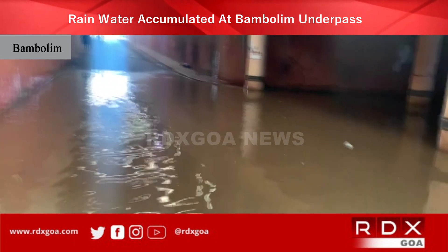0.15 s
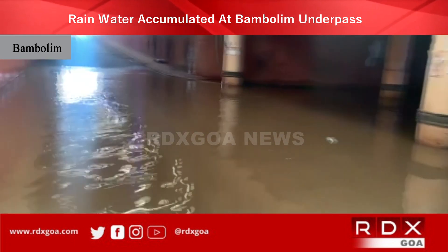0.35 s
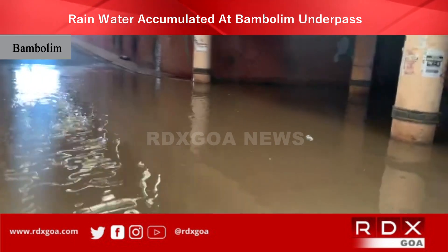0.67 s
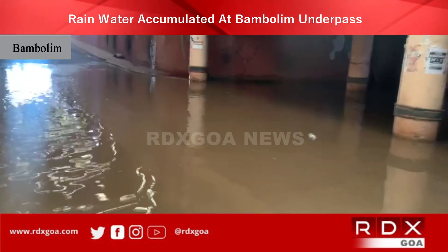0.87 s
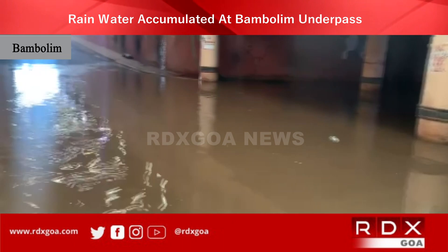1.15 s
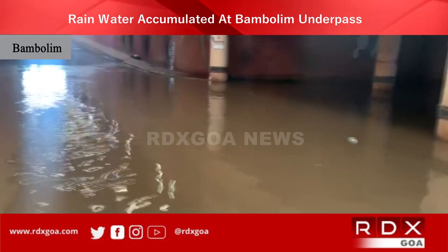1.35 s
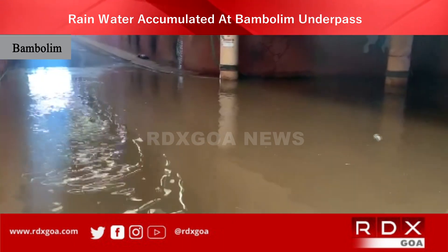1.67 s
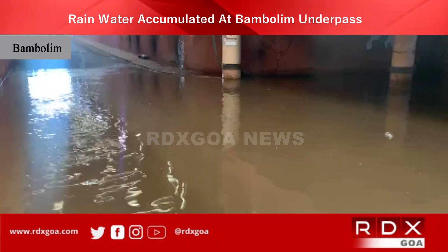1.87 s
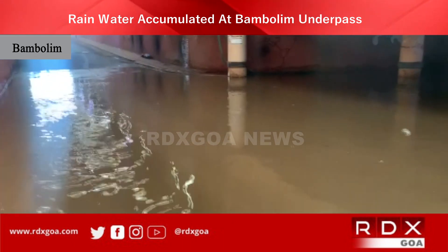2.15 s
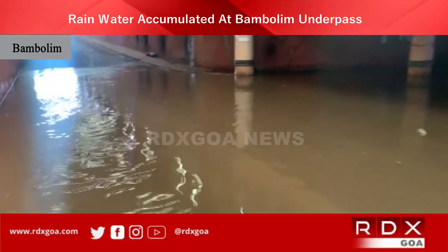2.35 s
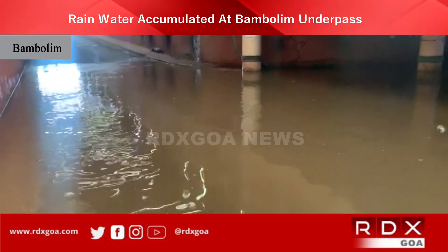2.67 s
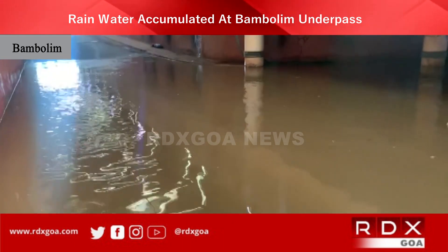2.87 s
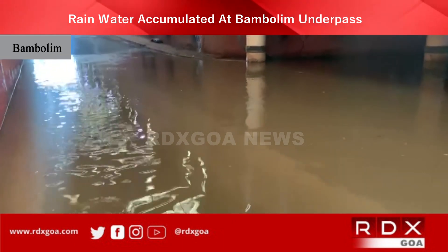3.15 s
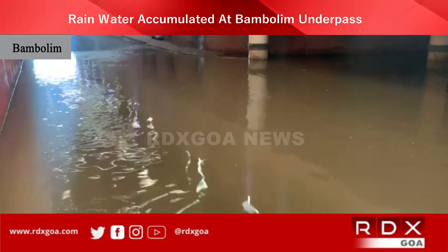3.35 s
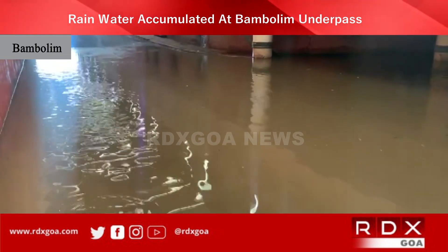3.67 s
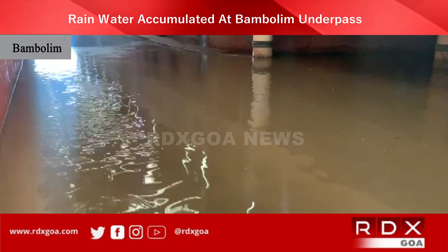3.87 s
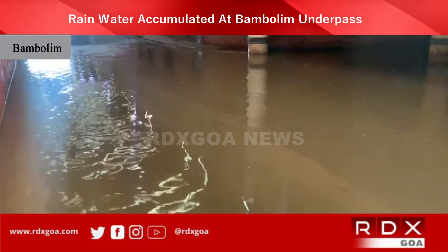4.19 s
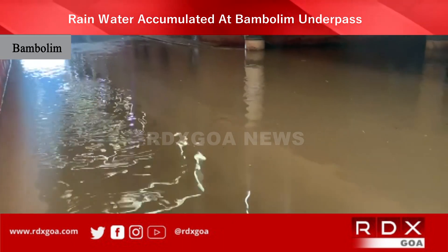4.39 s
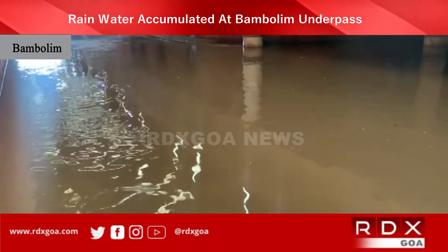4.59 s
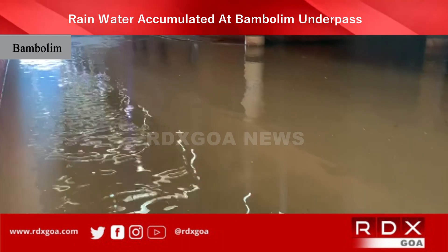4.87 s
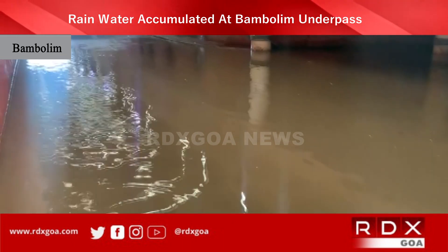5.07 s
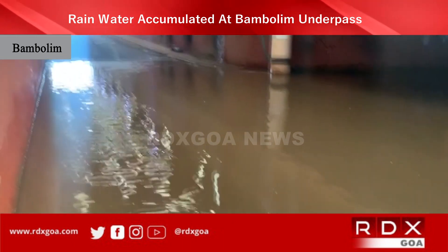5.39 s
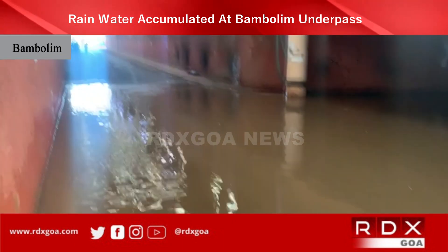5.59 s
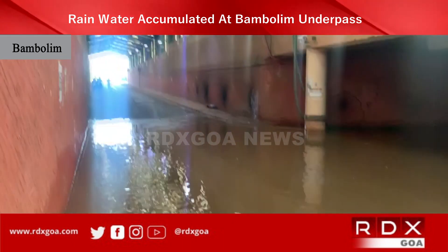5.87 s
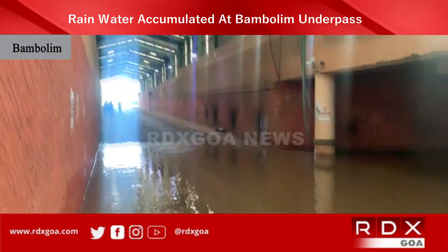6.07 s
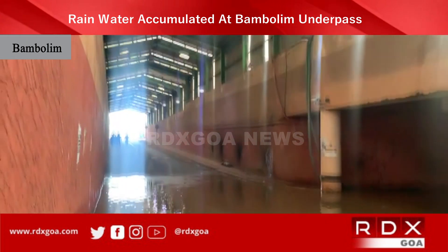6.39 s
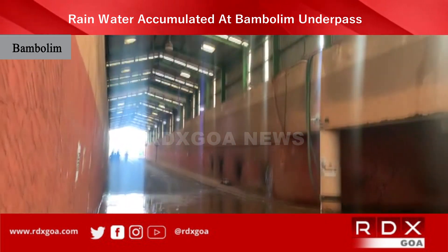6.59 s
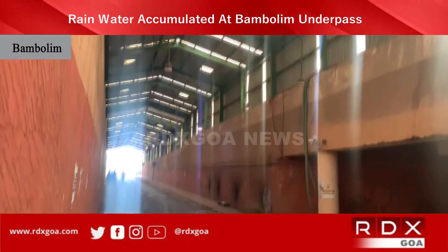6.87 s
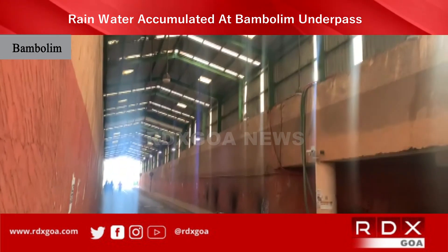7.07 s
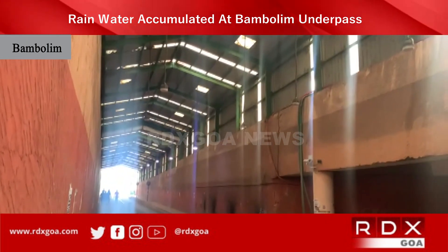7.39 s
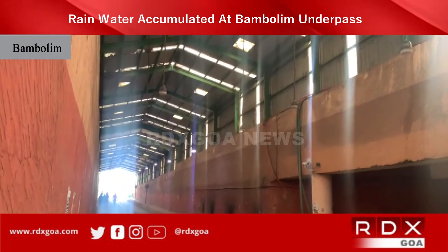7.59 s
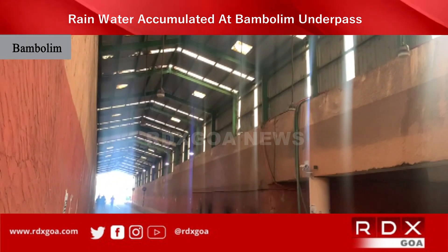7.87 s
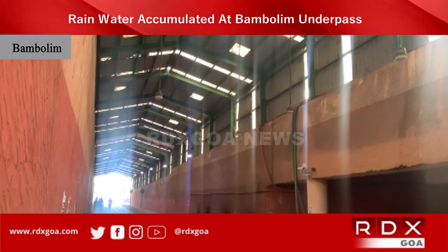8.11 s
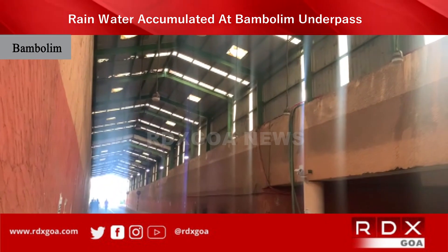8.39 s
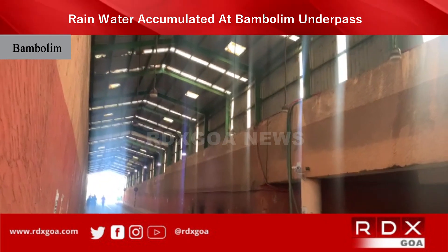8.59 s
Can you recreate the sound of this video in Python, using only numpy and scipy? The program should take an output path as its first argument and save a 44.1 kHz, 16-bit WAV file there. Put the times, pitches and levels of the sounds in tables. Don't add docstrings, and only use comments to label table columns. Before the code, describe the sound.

Deep throbbing engine boom fills an echoing underpass as wet tyre roar and bright spray swell and fade, with faint blurred clangs and horns.

```python
import sys
import numpy as np
from scipy import signal
from scipy.io import wavfile
from scipy.ndimage import uniform_filter1d, minimum_filter1d

SR = 44100
rng = np.random.default_rng(int(sys.argv[2]) if len(sys.argv) > 2 else 0)


def elevation(decibels):
    levels = np.asarray(decibels, float)
    return 10 ** (levels / 20)


def log_audio(samples):
    frames = np.atleast_2d(samples).T
    limited = np.clip(frames, -1, 1)
    pcm = np.round(limited * 32767).astype(np.int16)
    wavfile.write(sys.argv[1], SR, pcm)


N = 385434


def evened(x):
    return x / np.sqrt(np.mean(x ** 2) + 1e-20)


def read(points, hz):
    f, value = np.transpose(points)
    return np.interp(np.log(hz + 1), np.log(f + 1), value)


def track(rows, t):
    s, value = np.transpose(rows)
    return np.interp(t, s, value)


def wander(t, lo_hz, hi_hz):
    rates_hz = np.geomspace(lo_hz, hi_hz, num=24)
    return evened(sum(np.sin(2 * np.pi * (f * t + rng.random())) / np.sqrt(f) for f in rates_hz))


def resonate(x, hz, width_hz):
    turn = np.exp(2j * np.pi * np.cumsum(hz * np.ones(x.shape[-1])) / SR)
    r = np.exp(-np.pi * width_hz / SR)
    return 2 * (turn * signal.lfilter([(1 - r) ** 2], [1, -2 * r, r * r], x / turn)).real


# time in seconds, share of the way out (0-1).
WALK = [(0, 0), (1, .3), (2.6, .85), (3.6, 1), (6, 1), (8.74, .85)]


def dead_spot(t):
    return 1 - track(WALK, t)


def boom_level_db(t):
    return -27 + 3.5 * dead_spot(t)


# frequency in Hz, width in Hz, level in dB.
TUNNEL_MODES = [(59.5, 12, 0), (73.5, 8, 0), (119, 30, 0)]


def tunnel_gain(hz):
    gain = elevation(-13.5)
    for mode_hz, width_hz, db in TUNNEL_MODES:
        gain = gain + elevation(db) / (1 + (2 * (hz - mode_hz) / width_hz) ** 2) ** 2
    return gain


# time in seconds, engine cycles per second.
SPEED = [(0, 9.78), (.4, 9.95), (.85, 9.81), (1.45, 9.94), (1.85, 9.9), (2.42, 9.48), (3.15, 10.2),
         (3.6, 10.11), (3.9, 9.95), (4.7, 10.14), (5.05, 10), (5.75, 9.54), (6.45, 10.62), (6.9, 9.42),
         (7.33, 10.42), (7.9, 9.5), (8.35, 9.47), (8.74, 9.6)]
# time in seconds, effort in dB.
EFFORT = [(0, -21.5), (.3, -13), (.8, -24), (1.2, -18), (2.0, -29), (2.25, -19), (3.1, -20), (3.6, -23),
          (4.2, -16.5), (4.6, -19), (5.5, -15.5), (6.6, -17.5), (7.55, -18.5), (7.85, -17.5), (8.74, -17)]
# level in dB on top of a mode, share of effort (0-1), dB added in the dead spot.
LOW_ORDERS = [(-19.5, 0.2, -0.5), (-18, 0.06, -11), (-19, 0.12, -0.5), (-18.5, 0.71, -2.5),
              (-19.5, 0.72, -1), (-23, 1, 0.5), (-22, .9, -0.6), (-21.5, 1, -0.3), (-21.5, .9, 1.8)]
HIGH_ORDERS_DB = [-17, -8, -10, -13.5, -16.5, -17.5, -19, -20, -14.5, -14.5, -17, -15.5, -16, -16, -14.5]


def engine(drift_db, jitter):
    t = np.arange(0, N, 32) / SR
    cycle_hz = uniform_filter1d(track(SPEED, t), size=200)
    effort_db = track(EFFORT, t) + 18
    dead = dead_spot(t)
    sizes = []
    for order, (db, share, dead_db) in enumerate(LOW_ORDERS, 5):
        sizes.append(elevation(db + share * effort_db + dead_db * dead) * tunnel_gain(order * cycle_hz))
    sizes += [elevation(boom_level_db(t) + db) for db in HIGH_ORDERS_DB]
    turns = np.cumsum(cycle_hz) * 32 / SR
    out = np.zeros((2, len(t)))
    for order, size in enumerate(sizes, 5):
        lag_turns = .09 + .7 * (order < 9)
        offset = (.09 + .2 * (order > 13)) * rng.standard_normal()
        phase = 2 * np.pi * (order * (turns - lag_turns) + (order == 5) / 2 + offset)
        phase = phase + jitter * order / 8 * wander(t, 1.5, 7.4)
        size = size * elevation(drift_db * wander(t, 0.61, 2.8))
        apart = order * (0.0034 + 0.023 * wander(t, .3, 2.5))
        out += np.sqrt(2) * size * np.cos([phase + apart, phase - apart])
    out[:, 450:] += .2 * out[:, :-450].copy()
    return .95 * signal.resample_poly(out, up=32, down=1, axis=1)[:, :N]


# frequency in Hz, correlation.
LIKENESS = [(60, 1), (130, 0.77), (200, 0.81), (290, 0.15), (440, 0.35), (700, 0.1), (9000, 0.0042)]


def wash(shape, level_db, patchy_db, flicker_db, size):
    hop = size // 4
    frames, hz = N // hop + 5, np.fft.rfftfreq(size, 1 / SR)
    a, b, c, d, patches = rng.standard_normal((frames, len(hz), 5)).T
    patches = uniform_filter1d(patches, size=size // 100, axis=0)
    patches = evened(uniform_filter1d(patches, size=5000 // hop, axis=1))
    same = np.clip(read(LIKENESS, hz), -1, 1)[:, None]
    left = a + 1j * b
    right = same * left + np.sqrt(1 - same ** 2) * (c + 1j * d)
    flicker = wander(np.arange(frames) * hop / SR, 3.0, 25)
    gain = elevation(read(shape, hz)[:, None] + patchy_db * patches + flicker_db * flicker)
    noise = signal.istft(np.array([left, right]) * gain, nperseg=size, noverlap=size - hop)[1][:, :N]
    return elevation(level_db) * evened(noise)


# frequency in Hz, level in dB per Hz.
BOOM = [(22, 3), (40, 1), (58, 5.5), (74, 4.5), (92, 4.5), (120, 11), (145, 5), (180, 0.5), (205, -3),
        (240, 0.5), (275, 0), (305, -3), (400, -40.5)]


def boom(t):
    return wash(BOOM, boom_level_db(t) + 1.2, patchy_db=1.5, flicker_db=1.5, size=4096)


# arrival in seconds, leaving in seconds, roar gain in dB, spray gain in dB.
PASSES = [
    (-.5, 0.094, -2, -3.1),
    (1.442, 4.2, 1.33, 1.9),
    (5.15, 6.806, 3.5, 2),
    (6.997, 8.006, 3, -0.7),
    (8.093, 9, 3, -1.7),
]


def passes(t, rise_s, which):
    gains = []
    for row in PASSES:
        rise = (t - row[0]) / rise_s
        leave = 1 + (row[1] - t) / .4
        gains.append(row[which] * np.clip(np.minimum(rise, leave), 0, 1))
    return np.max(gains, axis=0)


# frequency in Hz, level in dB per Hz.
ROAR = [(500, -15), (800, -1.5), (900, -3.5), (1000, -1), (1300, -3.5), (1800, -6.5), (2200, -9),
        (2800, -11.5), (3500, -22), (5000, -47)]


def roar(t):
    level_db = -37 + passes(t, rise_s=0.12, which=2)
    return wash(ROAR, level_db, patchy_db=1.0, flicker_db=-0.28, size=1024)


# frequency in Hz, level in dB per Hz.
SPRAY = [(1200, -8.5), (1800, 2), (2500, 6), (3500, 8.5), (4400, 7.5), (5200, 0.5), (6300, 2.5),
         (7000, -7.5), (7800, -19.5)]


def spray(spray_db):
    return wash(SPRAY, spray_db, patchy_db=1.0, flicker_db=0.64, size=512)


# time in seconds, peak in dB.
BURSTS = [(1.2695, -40), (3.4226, -37), (5.0898, -33), (5.4854, -40), (5.9559, -41), (6.3754, -41),
          (7.5398, -40), (7.7573, -41)]


def droplets(level_db, per_s, spread_db):
    size = elevation(spread_db * np.minimum(rng.exponential(1, (2, N)), 3))
    size = size * (rng.random((2, N)) < per_s / SR)
    ticks = elevation(level_db) * evened(size * rng.choice([-1, 1], (2, N)))
    out = np.pad(ticks, ((0, 0), (0, 2600)))
    t = np.arange(2600) / SR
    for s, db in BURSTS:
        start = round(s * SR)
        out[:, start:start + len(t)] += rng.standard_normal((2, len(t))) * elevation(db - 1 - 60 * t / .07)
    return signal.sosfilt(signal.butter(2, 5500, "high", fs=SR, output="sos"), out)[:, :N]


# start in seconds, length in seconds, level in dB, centre in Hz, fade in dB per second.
SQUEAL = [
    (0, 0.85, -42.5, 3520, 8.5),
    (1.048, 0.84, -47, 3484, -2),
    (1.901, 1.2, -43, 3416, 7.5),
]


def squeal():
    out = np.zeros((2, N))
    for s, length_s, db, hz, fade in SQUEAL:
        at = np.arange(round(s * SR), round((s + length_s) * SR))
        t = at / SR - s
        band = resonate(rng.standard_normal((2, len(at))), hz - 46 * t, width_hz=330)
        out[:, at] += elevation(db - fade * t) * evened(band) * signal.windows.tukey(len(at), .08)
    return out


# frequency in Hz, level in dB per Hz.
RUMBLE = [(250, -17), (310, -4), (345, 5.5), (420, 3.5), (470, -2.5), (530, -6.5), (650, -8.5),
          (800, -10.5), (1100, -34)]


def rumble(t):
    return wash(RUMBLE, -29.5 - .5 * t, patchy_db=1.23, flicker_db=0.84, size=2048)


# start in seconds, length in seconds, pitch in Hz, level in dB, fade in dB per second.
CLANGS = [(0, .35, 630, -35, 14), (0, .3, 735, -37, 16), (0, .34, 800, -45, 5), (.85, .2, 860, -43, 13),
          (1.52, .2, 1170, -42, 17), (2.1, .9, 1234, -48, 1), (3.1, .45, 1190, -46, -2),
          (5.12, .4, 970, -45, 7.5), (5.12, .2, 1500, -39, 22), (6.4, .75, 987, -46, -2),
          (6.3, .8, 1700, -47, 5), (7.5, .5, 2910, -50, 4), (8.18, .5, 835, -40.5, 6),
          (8.5, .24, 940, -47, 4)]
HORNS = [
    (1.5, .15, 900, -41, 25),
    (1.73, 1.1, 1805, -44.5, 3),
    (7.9, .7, 600, -42, 1),
    (7.1, .3, 560, -43, 3),
]
WHOOSHES = [
    (0, .3, 680, -35.5, 22),
    (1.5, .3, 1300, -43, 11),
    (5.1, .2, 1400, -43, 15.5),
]


def rings(rows, width_hz):
    out = np.zeros((2, N))
    for s, length_s, hz, db, fade in rows:
        at = np.arange(round(s * SR), min(round((s + length_s + .4) * SR), N))
        t = at / SR - s
        onset = np.minimum(t / 0.0083 + (s == 0), 1)
        shape = elevation(db - fade * t - 33 * np.maximum(t - length_s, 0)) * onset
        tone = resonate(rng.standard_normal((2, len(at) + 4000)), hz, width_hz)[:, 4000:]
        out[:, at] += shape * evened(tone)
    return out


def scene():
    t = np.arange(N) / SR
    spray_db = -44.5 + passes(t, rise_s=0.47, which=3)
    out = engine(drift_db=1.87, jitter=.12) + boom(t)
    out += roar(t) + spray(spray_db)
    out += droplets(spray_db - 10.5, per_s=300, spread_db=3.5)
    out += squeal() + rumble(t)
    out += rings(CLANGS, width_hz=30) + rings(HORNS, width_hz=110) + rings(WHOOSHES, width_hz=450)
    return out


# frequency in Hz, gain in dB.
LEFT_COLOUR = [(60, -1.1), (200, -.7), (440, -.7), (1000, 0), (7930, 0), (8030, 0), (8500, -3), (9000, -6),
               (10000, -8), (11000, -11), (11600, -19), (11850, -28), (13400, -36), (13700, -55)]
RIGHT_COLOUR = [(60, 1.1), (200, .7), (440, .7), (1000, 0), (7930, 0), (8030, 9.5), (9400, 4.5),
                (10000, -3), (11000, -14), (11850, -29), (12050, -20), (13300, -18), (13900, -22),
                (14300, -23)]


def colour_sides(x):
    hz, _, z = signal.stft(x, SR, nperseg=2048)
    colour = elevation(np.array([read(LEFT_COLOUR, hz), read(RIGHT_COLOUR, hz)]))
    return signal.istft(z * colour[..., None], SR, nperseg=2048)[1][:, :N]


def soft_limit(x):
    peak = -minimum_filter1d(-abs(x).max(axis=0), size=900)
    return x / np.maximum(uniform_filter1d(peak, size=900) / .83, 1)


# frequency in Hz, step in dB over the band level.
SUM_STEP = [(300, -20), (1000, 1), (2100, 7), (2600, 6), (3100, 9), (3600, 7), (4500, 7), (4900, 11.5),
            (5500, 11.5), (5750, 4), (6750, 4), (7000, 14.5), (7550, 16), (7700, 7)]
DIFFERENCE_STEP = [(300, -15), (1000, -1), (2200, 3), (2700, 6), (3300, 5), (3900, 8), (4500, 7), (4900, 3),
                   (5550, 3), (5800, 12), (6400, 16), (6800, 13), (7000, 3)]


def phone_rounding(x, wobble_db, size, count):
    n, k = np.arange(2 * size) + .5, np.arange(count) + .5
    window = np.sin(np.pi * n / (2 * size))[:, None]
    basis = window * np.cos(np.pi / size * np.outer(n + size / 2, k)) * np.sqrt(2 / size)
    pair = np.array([x[0] + x[1], x[0] - x[1]]) / 2
    pair = np.pad(pair, ((0, 0), (size, 2 * size - N % size))).reshape(2, -1, size)
    lines = np.concatenate([pair[:, :-1], pair[:, 1:]], axis=2) @ basis
    hz = k * SR / (2 * size)
    band = (50 * np.log(1 + hz / 4000)).astype(int)
    power = uniform_filter1d((lines ** 2).mean(axis=0), size=12, axis=1)
    level = np.sqrt(uniform_filter1d(power, size=18, axis=0))
    luck = rng.standard_normal((2, lines.shape[1], band[-1] + 1))
    luck = evened(uniform_filter1d(luck, size=2, axis=2))
    luck = evened(luck + .5 * np.roll(luck, 1, axis=1))[..., band]
    step_db = np.array([read(SUM_STEP, hz), read(DIFFERENCE_STEP, hz)])[:, None]
    step = level * elevation(step_db + wobble_db * luck)
    rounded = step * np.fix(lines / step + 0.48 * np.sign(lines))
    error = (rounded - lines) @ basis.T
    pair[:, :-1] += error[..., :size]
    pair[:, 1:] += error[..., size:]
    mid, side = pair.reshape(2, -1)[:, size:size + N]
    return np.array([mid + side, mid - side])


def top_cut(x):
    return signal.sosfilt(signal.butter(12, 14250, fs=SR, output="sos"), x)


def record(dry):
    x = soft_limit(colour_sides(dry))
    mix = phone_rounding(x, wobble_db=4.5, size=1024, count=372)
    return top_cut(mix)


dry = scene()
out = record(dry)
log_audio(out)
```